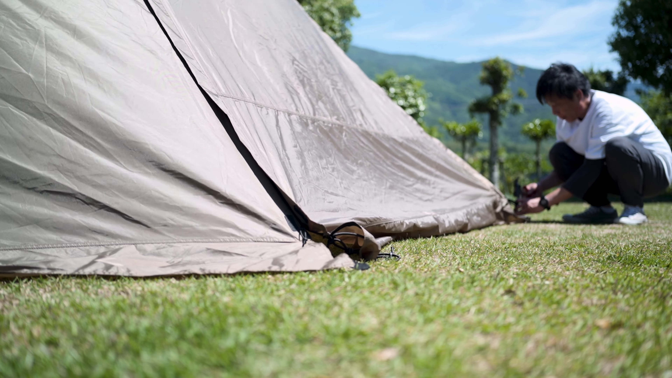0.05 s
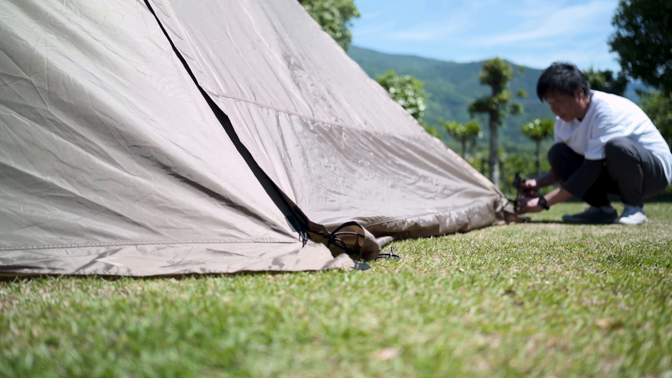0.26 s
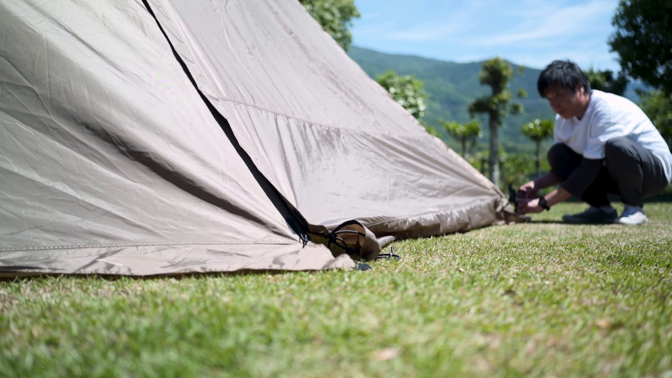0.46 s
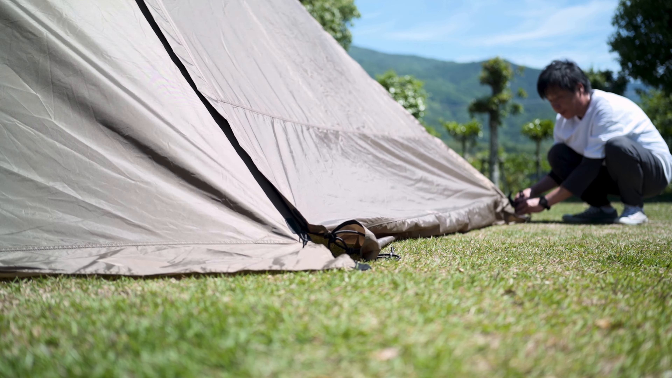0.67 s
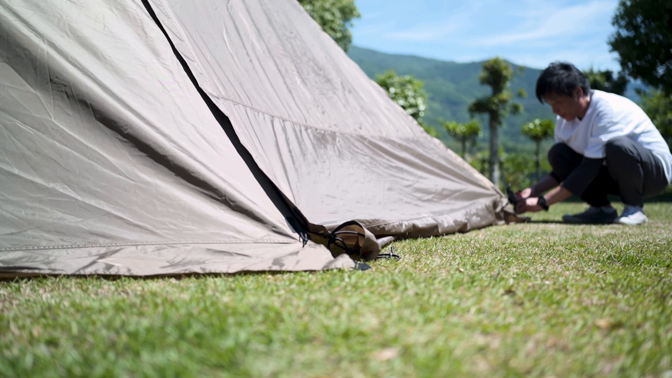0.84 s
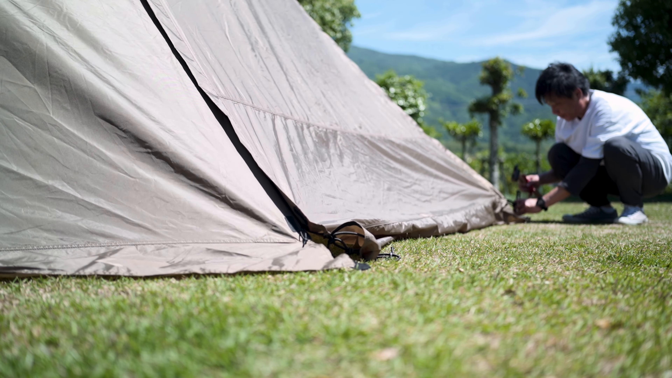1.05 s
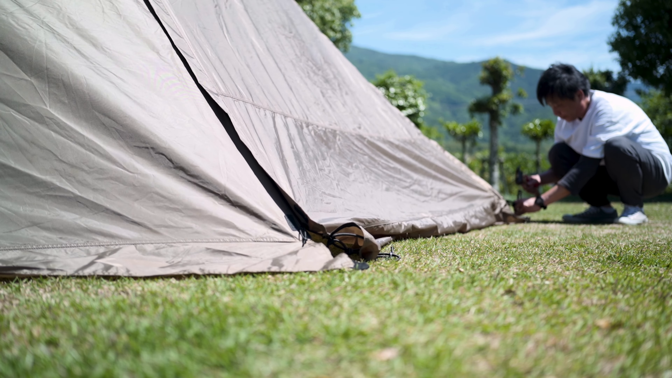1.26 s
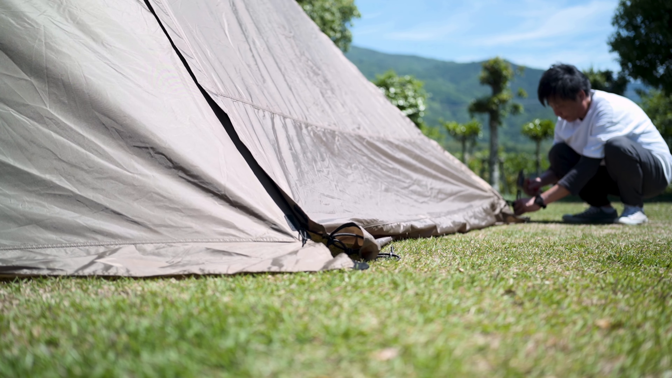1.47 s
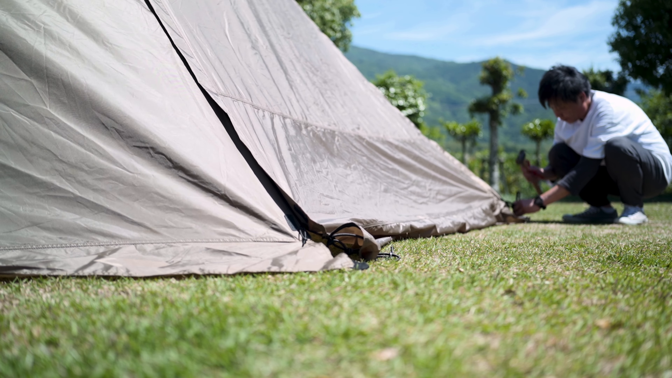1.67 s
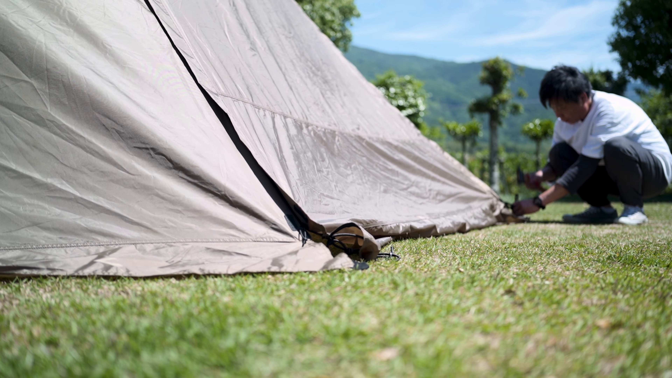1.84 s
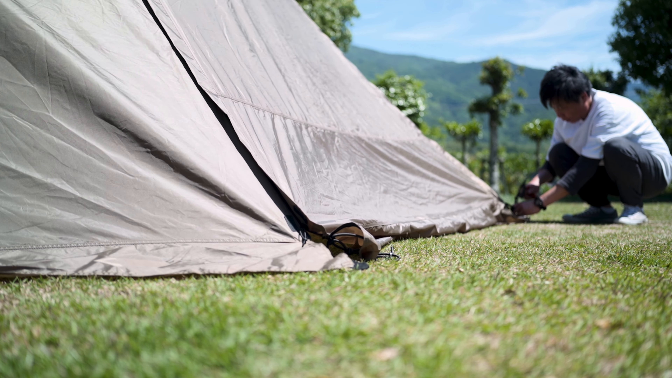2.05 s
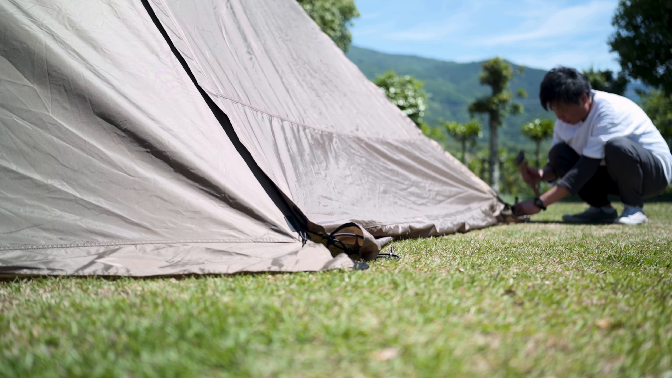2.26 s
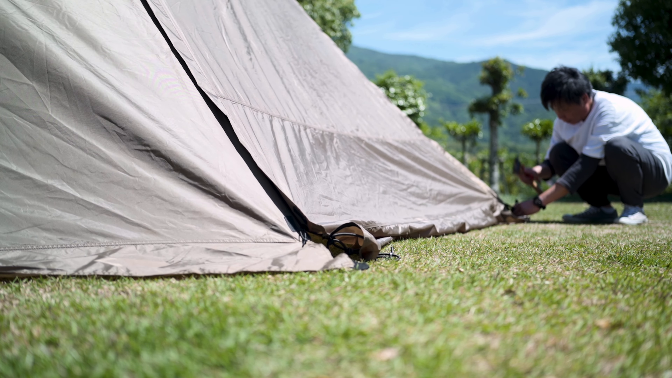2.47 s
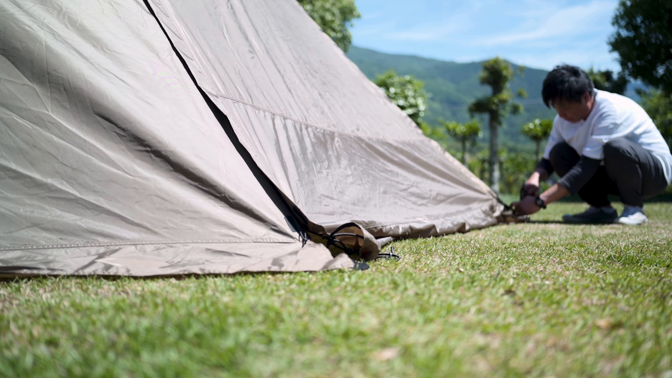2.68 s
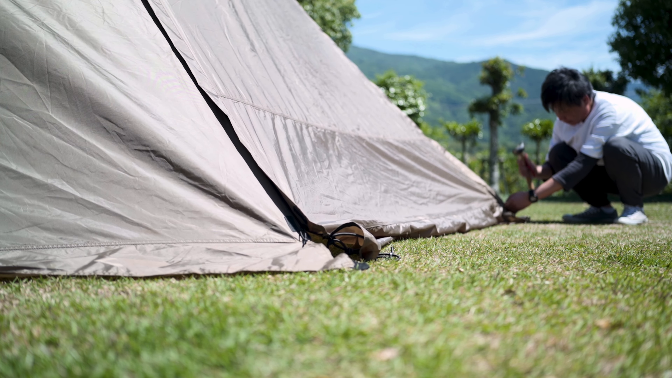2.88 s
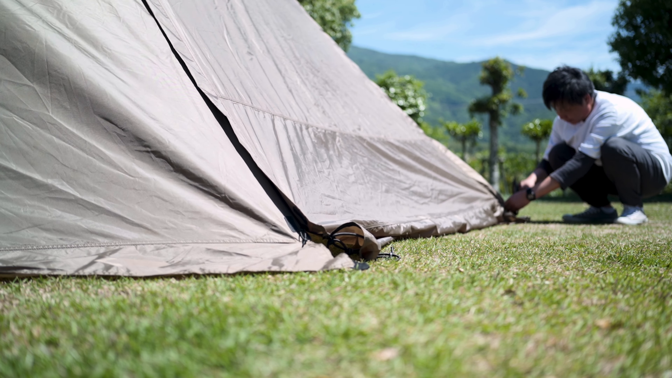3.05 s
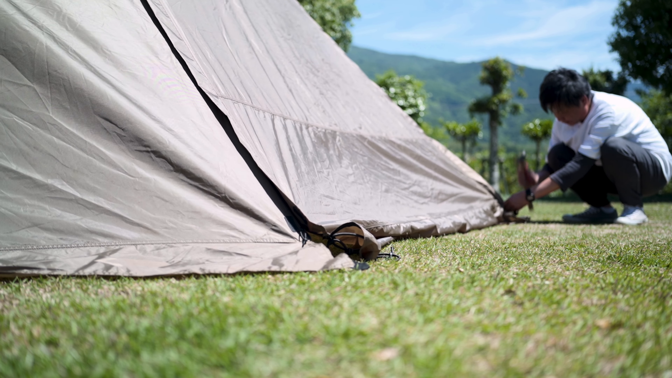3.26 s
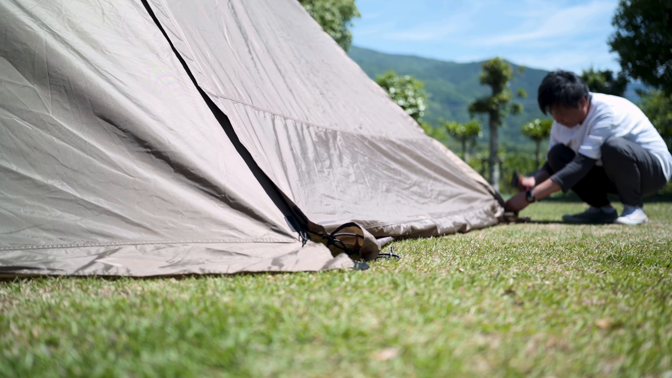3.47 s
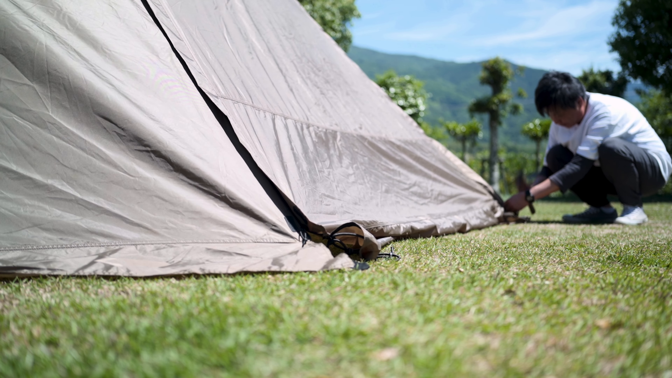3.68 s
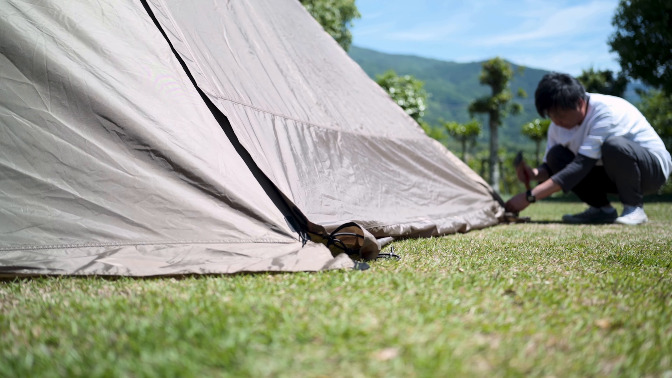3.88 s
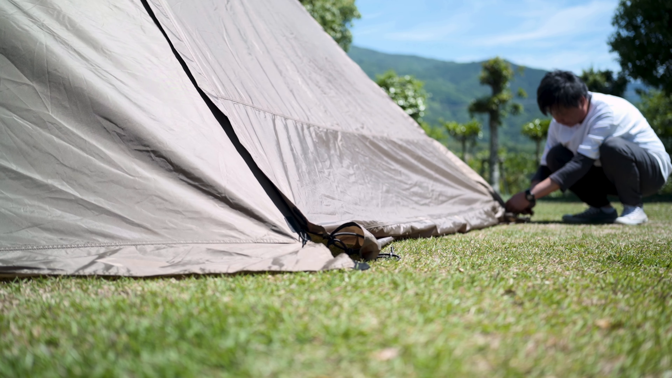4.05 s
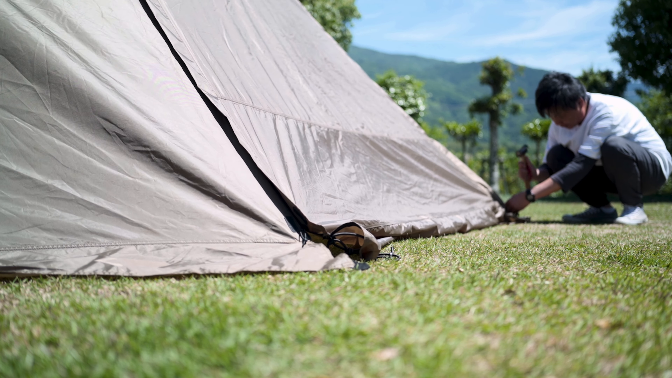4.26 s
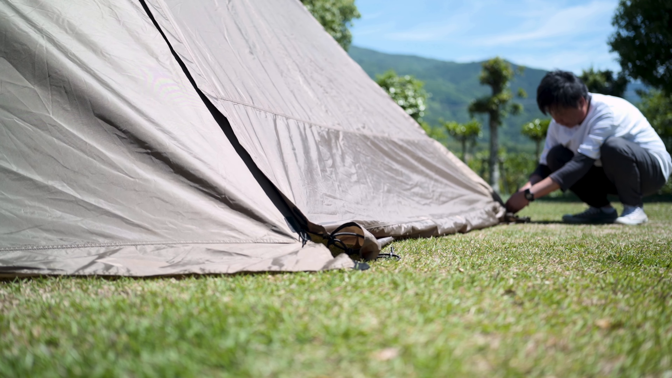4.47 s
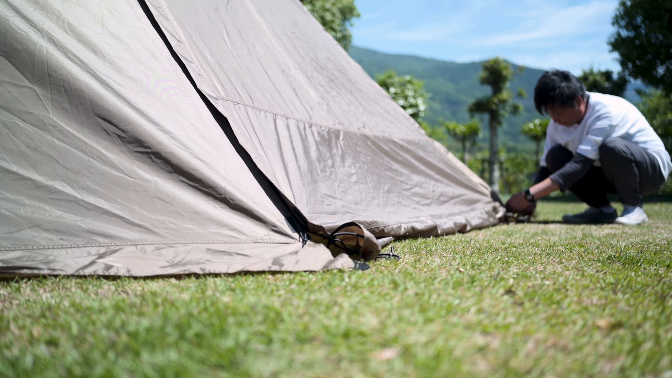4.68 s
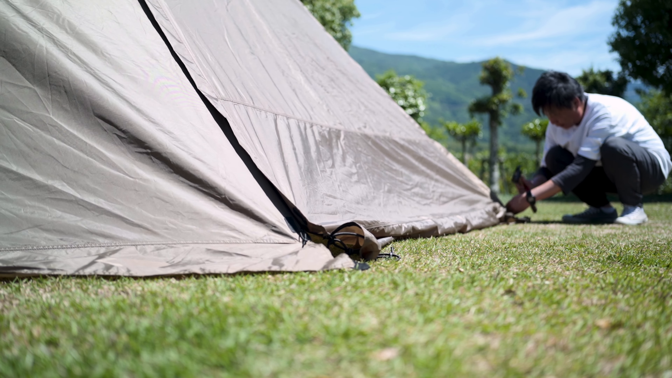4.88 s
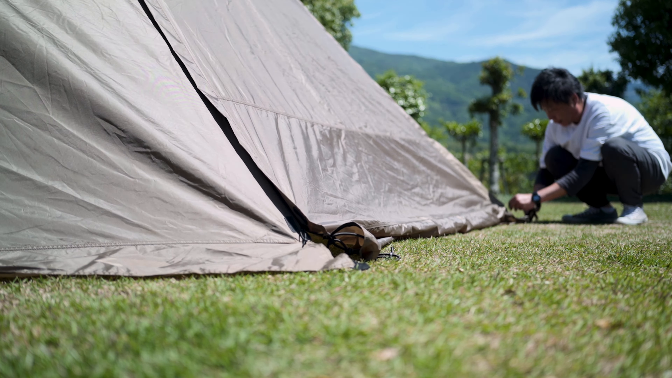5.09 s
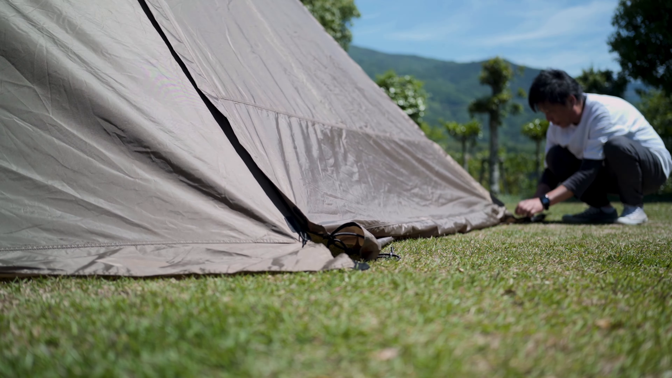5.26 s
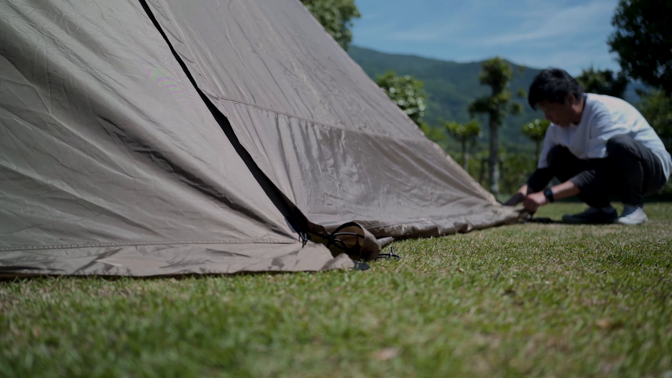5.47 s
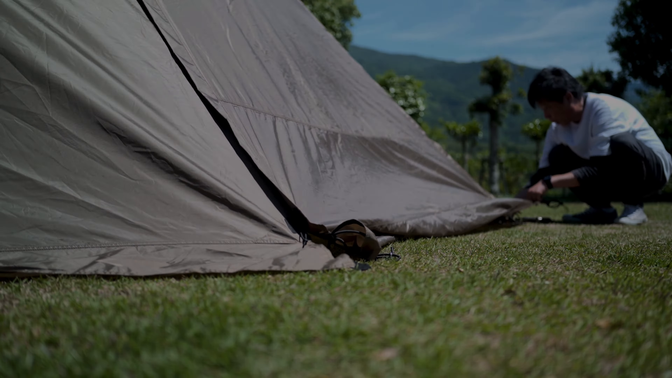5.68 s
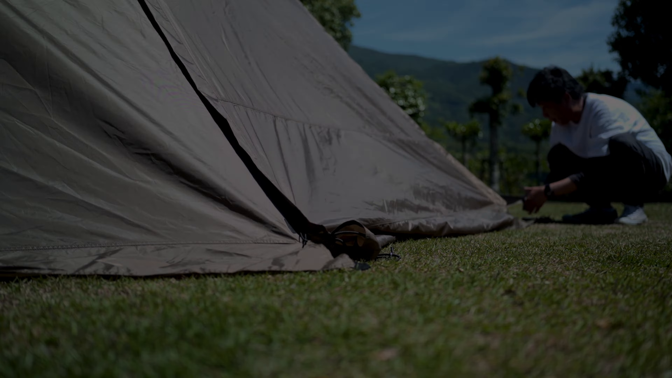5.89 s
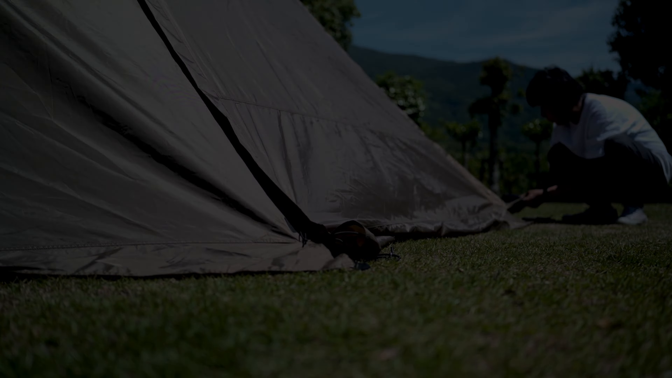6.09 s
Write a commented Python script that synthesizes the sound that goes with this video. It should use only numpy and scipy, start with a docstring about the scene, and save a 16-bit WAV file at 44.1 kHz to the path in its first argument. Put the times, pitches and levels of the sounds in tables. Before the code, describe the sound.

A soft outdoor wash with a faint low hum runs throughout. In the first 0.4 seconds a few tiny, thin bird chirps sound, and a crow caws hoarsely far away at about 0.2 and 1.1 seconds. At 1.6 seconds a hammer begins hitting a steel tent peg: twelve blows, roughly every 0.3 seconds, until 5.1. Each is a sharp, dry metallic crack with very high, brief ringing, loud enough to clip the microphone, followed by a quick scattered slap from ground and tent wall and a hissing return from trees. Pitch colour and ring length vary from blow to blow; from about 3 seconds the ground thud grows, and the last blow is the heaviest. Another distant caw falls at 2.0, faint chirps at 3.3 and 4.0. From 5.5 to 6.1 seconds tent cloth rustles crisply, with dull flaps and two tiny buckle ticks just before 6.

```python
"""An outdoor hush with a low hum runs throughout; small birds chirp and a crow caws far off, both
before and between the blows. From 1.57 s a hammer drives a steel tent peg into a lawn with twelve
blows that overload the microphone. Damped modes make the steel ring, a low push makes the ground
thud, and scattered reflections from ground, tent wall and then trees throw each blow back.
At the end filtered noise grains rustle as tent cloth, with dull flaps and two buckle ticks."""
import sys
import numpy as np
from scipy import signal
from scipy.fft import rfft, irfft
from scipy.io import wavfile
from scipy.ndimage import uniform_filter1d

SR = 44100
rng = np.random.default_rng(int(sys.argv[2]) if len(sys.argv) > 2 else 0)


def to_wav(sig):
    """Store sig (one row per channel, or 1-D mono) as 16-bit WAV at the path in sys.argv[1].

    Samples outside -1..1 are clipped; the rate is SR.
    """
    pcm = np.clip(np.atleast_2d(sig), -1, 1) * 32767
    pcm = np.round(pcm).astype(np.int16)
    wavfile.write(sys.argv[1], SR, pcm.T)  # frames by channels


N = 270377

# Levels in the tables are relative: each source adds its own gain. Spectra list [f/Hz, level/dB].
# Outdoor wash: spectrum [f/Hz, level/dB]
HUSH_SPECTRUM = [(25, -46.5), (45, -18), (70, -10), (100, -3), (240, -4.5), (500, -9), (800, -13.5),
                 (1300, -17), (2000, -23.5), (4500, -26.5), (7000, -30.5), (11000, -29), (15500, -35.5),
                 (16300, -56.5)]
HUSH_DB = -63
HUM_HZ, HUM_DB = 59.06, -64.5

# Bird whistles: [t/s, length/s, start f/Hz, end f/Hz, level/dB]
CHIRPS = [(0.127, 0.034, 3500, 3450, -73), (0.18, 0.061, 3600, 3600, -75), (0.384, .03, 3500, 3450, -76),
          (3.33, 0.038, 3110, 3000, -74.5), (4.016, 0.054, 5400, 5390, -57.5),
          (4.039, 0.077, 4520, 4030, -69.5)]

# Crow calls: [t/s, length/s, lower throat ring level/dB, upper ring level/dB]
CAWS = [(0.219, .5, -60.5, -57), (1.088, 0.43, -58, -58), (2.043, 0.47, -61.5, -59.5)]
# Course of every caw: [share of length, lower ring level/dB, upper ring level/dB,
# mouth opening as a factor on the f of the sinking strand]
CAW_SHAPE = [(0, -27, -29, .86), (.08, -4, -18, .9), (.2, 1, -11.5, 1), (.34, -8.5, 0.5, 1),
             (.55, -7, -6, 1), (.7, -17, -7, .94), (.88, -15, -10.5, 0.87), (1, -29, -15, 0.72)]

# Course of the cloth friction: [t/s, swish level/dB, hiss level over swish/dB]
RUSTLE = [(5.45, -76, -7), (5.54, -69.5, -11), (5.6, -53, -6), (5.67, -47.5, 2.5), (5.71, -54, 3),
          (5.75, -52, 0.5), (5.785, -61, -3), (5.83, -60.5, 3), (5.892, -72, -2), (5.901, -53, -18),
          (5.927, -56, 3), (5.95, -54.5, 1.26), (5.975, -64, -1.5), (5.995, -55.5, 0.3), (6.06, -79, -1),
          (6.09, -69, 13.5), (6.13, -75.5, 19.5)]
# Spectra of swish, hiss and flaps: [f/Hz, level/dB]
SWISH_SPECTRUM = [(2000, -44), (4000, 3), (6500, 7.5), (9000, 4), (12000, -40), (15800, -30), (16300, -60)]
HISS_SPECTRUM = [(6000, -15.5), (8500, -3), (12000, -2.5), (13000, -9.5), (15700, -10), (16200, -48)]
FLAP_SPECTRUM = [(120, -6), (280, 1), (800, -0.5), (2000, -9.5), (4000, -21), (9000, -48)]
# Dull cloth flaps: [t/s, hold/s, level/dB]
FLAPS = [(5.66, 0.026, -64), (5.787, 0.0075, -64), (5.901, 0.037, -48.5), (5.986, 0.0077, -83),
         (6.08, 0.034, -74)]
FLAP_RISE_DB_PER_S, FLAP_FALL_DB_PER_S, FLAP_REST_DB = 4000, 401, -69

# Buckle ticks: [t/s, click peak level/dB, thin ring level/dB]
TICKS = [(5.924, -30, -66), (5.9858, -26.5, -57)]

# Reflection spectra of ground, tent wall and trees: [f/Hz, level/dB]
GROUND_SPECTRUM = [(300, -7.5), (1500, -4.5), (4000, -9), (9000, -8), (12000, -8.5), (15700, -9.5),
                   (16200, -39)]
WALL_SPECTRUM = [(300, -7), (1000, -5), (2700, 2), (4500, -6.5), (6500, -9.5), (9500, -6), (12000, -16),
                 (15700, -19.5), (16200, -39)]
TREES_SPECTRUM = [(300, -30), (1500, -9), (3000, -5), (4500, -1), (7000, 0.5), (9500, 2.5), (12500, -6.5),
                  (15700, -16.5), (16200, -39.5)]
# Reverberation of the trees: [f/Hz, time to fall 60 dB/s]
TREES_T60 = [(1000, .5), (4000, 0.25), (9000, 0.26), (14000, 0.25)]
ECHO_TREBLE_DB = -3.5  # further echo level from 9 kHz up
THROWN_RING_DB, THROWN_RING_T60_S = 1.5, 0.02  # only the start of the short rings is thrown back

RUMBLE_DB, RUMBLE_FOLLOW = -31, 0.54  # the rumble follows the thud by this share of its dB

# Two long rings of the hammer head: [low f/Hz, high f/Hz]
HEAD_HZ = (5696, 7537)
# Low and high long ring of each blow, each: [top level/dB, rise time/s, time to fall 37.7 dB/s,
# bend of the fall, echo level/dB, time for the echo to fall 34 dB/s]
LONG_RINGS = [
    [(-33.0, 0.007, 0.107, 0.502, -49.8, 0.152), (-16.7, 0.0119, 0.0306, 2.5, -49.8, 0.109)],
    [(-19.7, 0.00471, 0.266, 0.729, -30.5, 0.167), (-22.0, 0.002, 0.0303, 2.12, -74.1, 0.231)],
    [(-25.6, 0.0047, 0.0673, 1.07, -44.5, 0.13), (-21.7, 0.00503, 0.0598, 1.25, -47.5, 0.0941)],
    [(-33.3, 0.004, 0.123, 0.501, -51.9, 0.149), (-33.1, 0.002, 0.05, 1.92, -53.0, 0.0939)],
    [(-35.6, 0.004, 0.139, 0.652, -52.5, 0.193), (-36.9, 0.00446, 0.0549, 1.73, -53.9, 0.0961)],
    [(-29.4, 0.002, 0.314, 1.52, -28.3, 0.177), (-27.8, 0.002, 0.0746, 1.56, -50.2, 0.107)],
    [(-26.0, 0.0186, 0.171, 0.5, -37.2, 0.239), (-28.1, 0.00582, 0.0744, 1.28, -52.2, 0.163)],
    [(-46.7, 0.002, 0.508, 1.19, -47.6, 0.229), (-19.1, 0.00575, 0.0837, 0.841, -38.7, 0.114)],
    [(-33.0, 0.00549, 0.149, 0.592, -53.0, 0.12), (-33.1, 0.002, 0.0972, 1.69, -49.3, 0.136)],
    [(-57.0, 0.002, 0.381, 1.07, -55.3, 0.186), (-8.9, 0.00824, 0.121, 0.546, -34.2, 0.0858)],
    [(-40.1, 0.007, 0.119, 1.49, -54.9, 0.177), (-23.6, 0.0043, 0.0424, 1.51, -48.6, 0.0769)],
    [(-12.3, 0.0182, 0.119, 0.5, -38.6, 0.0689), (-10.4, 0.00498, 0.0395, 1.23, -59.7, 0.139)],
]
RING_ECHO_S, RING_ECHO_RISE_S, RING_ECHO_BEND = .085, .008, 2.2
RING_ECHO_CANCEL = .85  # the echo returns out of step and cancels the ring where the two are alike

# Damped modes of the steel in four groups, each mode: [f/Hz, level/dB, time to fall 60 dB/s]
STEEL_MODES = [
    [(9330, -2, .014), (9520, 0, .018)],
    [(12090, 0, .014), (11500, -16, .02)],
    [(12610, 0, .028), (12810, -14, .05)],
    [(13960, 0, .016), (15650, -10, .016)],
]
# Spectra of the bright grit and the dull crack: [f/Hz, level/dB]
BRIGHT_SPECTRUM = [(4000, -23), (6500, -4.5), (8500, 0.5), (11000, -3), (13000, 2), (15500, -3.5),
                   (17000, -18)]
DULL_SPECTRUM = [(700, -29), (1300, -8.5), (2100, -1), (3000, -1.5), (4700, 3.5), (6000, 3), (8000, -26)]
GRIT_DB = -14
# Hammer blows: [t/s, dull crack level/dB, level/dB of the four mode groups, factor on mode times,
# low and high knock level/dB, thud level/dB, thud f/Hz, echo level/dB]
BLOWS = [(1.5708, -27.5, -21.5, -18.5, -16.5, -18, 2.3, -55.5, -44.5, -74, 183, -16.5),
         (1.8411, -20.5, -17, -6.5, -8.5, -17.5, 0.93, -36.5, -38, -56, 156.6, -19),
         (2.1237, -26.5, -25, -9, -11, -12, 0.53, -36, -43, -70, 176, -17.5),
         (2.411, -25.5, -21.5, -13.5, -11, -14.5, 0.98, -32.5, -46, -51, 177.6, -16.5),
         (2.7088, -28.5, -16, -8.5, -13.5, -10, 0.61, -42.5, -35.5, -56.5, 132.7, -19),
         (3.0564, -19.5, -23, -13, -17, -11, 1.4, -32.5, -26, -39.5, 121, -16.5),
         (3.4028, -22.5, -15, -16, -12, -9, 0.94, -25, -28, -42, 133.5, -16),
         (3.7946, -24, -27.5, -19.5, -9, -13, 1.14, -44.5, -28, -50, 108.6, -15.5),
         (4.124, -20, -32.5, -7, -10, -27, 1.27, -38, -31.5, -55, 122, -17),
         (4.452, -15.5, -34.5, -14, -13, -20.5, 1.33, -31.5, -27, -37, 118.7, -17.5),
         (4.7685, -23.5, -31.5, -15.5, -14.5, -6.5, 0.75, -34, -30.5, -38, 112.5, -16),
         (5.0687, -17.5, -39, -19.5, -19, -16.5, 1.8, -18, -20, -26, 129.5, -21.5)]
FORE_TICK_S, FORE_TICK_DB, FORE_TICK_LENGTH_S = 0.0017, -22.5, 0.00048  # tick ahead of each blow
EDGE_HZ = 16500


def gain_of(db):
    """Level law: 20 dB make a factor of ten in amplitude."""
    return 10 ** (np.asarray(db) / 20)


def evened(x):
    """Normalisation to unit effective value (RMS)."""
    return x / np.sqrt(np.mean(x ** 2) + 1e-20)


def read(points, hz):
    """Linear interpolation over logarithmic frequency."""
    f, value = np.transpose(points)[:2]
    return np.interp(np.log(hz + 1), np.log(f + 1), value)


def add(mix, s, sound):
    """Superposition: a sound starting at s seconds adds to the mix."""
    part = mix[round(s * SR):][:len(sound)]
    part += sound[:len(part)]


def coloured(x, spectrum):
    """Linear filtering: each frequency of x is weighted by a spectrum in dB."""
    hz = np.fft.rfftfreq(len(x), 1 / SR)
    return irfft(rfft(x) * gain_of(read(spectrum, hz)), len(x))


def resonate(x, hz, width):
    """Resonance by heterodyning: shift the curve hz to zero, smooth, shift back; peak gain 1."""
    turn = np.exp(2j * np.pi * np.cumsum(hz * np.ones(len(x))) / SR)
    r = np.exp(-np.pi * width / SR)
    smooth = signal.lfilter([1 - r], [1, -r], x / turn + 1e-18)
    return 2 * (turn * smooth).real


def hush():
    """Broadband noise with a slowly varying spectrum: a distant wash in patches, and a wavering hum."""
    frames, hz = N // 256 + 5, np.fft.rfftfreq(1024, 1 / SR)
    a, b, patches = rng.standard_normal((frames, 513, 3)).T
    patches = uniform_filter1d(uniform_filter1d(patches, 14, 0), 16, 1)
    patches = 1.3 * evened(patches)  # dB
    z = (a + 1j * b) * gain_of(read(HUSH_SPECTRUM, hz)[:, None] + patches)
    wash = evened(signal.istft(z, nperseg=1024, noverlap=768)[1][:N])
    hum = resonate(resonate(rng.standard_normal(N), HUM_HZ, 15), HUM_HZ, 25)
    return gain_of(HUSH_DB) * wash + gain_of(HUM_DB) * evened(hum)


def chirp(s, length, start_hz, end_hz, db):
    """Narrow-band resonance of noise: a far, slightly fuzzy whistle, level or falling in pitch."""
    n = round(length * SR)
    whistle = resonate(rng.standard_normal(n), np.linspace(start_hz, end_hz, n), 60)
    return s, gain_of(db) * evened(whistle) * np.hanning(n)


def caw(start, length, low_top_db, high_top_db):
    """Source and filter: uneven throat pulses ring resonances; one strand sinks as the mouth closes."""
    share, *shape = np.transpose(CAW_SHAPE)
    t = np.arange(0, length, 1 / SR)
    low_db, high_db, mouth = (np.interp(t / length, share, c) for c in shape)
    jitter, grit = rng.standard_normal((2, len(t)))
    pulse_hz = 64 * (1 + 0.089 * evened(uniform_filter1d(jitter, 600)))
    turns = np.cumsum(pulse_hz) / SR
    pulses = np.exp(-(turns % 1) / 0.39) * (0.91 + grit) + 0.75 * grit

    def ring(hz, width):
        """Two cascaded resonances shape the pulses."""
        return evened(resonate(resonate(pulses, hz, width), hz, 2 * width))

    closing = np.clip((1 - mouth) / .2, 0, 1)
    steady = (1 - 0.22 * closing) * ring(1704, 110)
    sinking = (0.42 + .5 * closing) * ring(1570 * mouth, 170)
    top = (.12 + .45 * closing) * ring(2360, 110)
    voice = gain_of(low_top_db + low_db) * ring(1080, 94)
    voice += gain_of(high_top_db + high_db) * (steady + sinking + top)
    return start, voice * signal.windows.tukey(len(t), .1)


def rustle():
    """Friction noise: cloth drags over cloth in fine grains, a few larger snaps and dull flaps."""
    s, swish_db, hiss_db = np.transpose(RUSTLE)
    t = np.arange(s[0], N / SR, 1 / SR)
    grit = rng.standard_normal((3, len(t)))
    grit *= gain_of(3.4 * np.minimum(rng.exponential(1, len(t)), 6))  # the larger snaps
    flaps = gain_of(FLAP_REST_DB)
    for at, hold, db in FLAPS:
        rise_db = FLAP_RISE_DB_PER_S * np.maximum(at - t, 0)
        fall_db = FLAP_FALL_DB_PER_S * np.maximum(t - at - hold, 0)
        flaps = flaps + gain_of(db - rise_db - fall_db)
    swish = gain_of(np.interp(t, s, swish_db))
    hiss = gain_of(np.interp(t, s, swish_db + hiss_db))
    layers = zip(grit, (SWISH_SPECTRUM, HISS_SPECTRUM, FLAP_SPECTRUM), (swish, hiss, flaps))
    return s[0], sum(level * evened(coloured(g, spectrum)) for g, spectrum, level in layers)


def tick(s, db, ring_db):
    """Impulse excitation: a buckle gives a bright click and a thin, high damped ring."""
    t = np.arange(round(.05 * SR)) / SR
    burst = rng.standard_normal(len(t)) * gain_of(-60 * np.abs(t - .002) / 0.0035)
    click = coloured(burst, [(3000, -44), (4200, -4), (12000, -11), (13000, -26)])
    ring = gain_of(ring_db - 60 * t / 0.069) * np.sin(2 * np.pi * 14900 * t)
    return s - .002, gain_of(db) * click / np.abs(click).max() + ring * (t > .002)


def surroundings():
    """Scattered reflection, drawn anew for each blow: ground and tent wall, then a swell from the trees."""
    taps = rng.standard_normal((3, SR // 2)) * gain_of(1.7 * rng.exponential(1, (3, SR // 2)))
    hz, t, z = signal.stft(taps, SR, nperseg=128, noverlap=96)
    ground_db = read(GROUND_SPECTRUM, hz)[:, None] - 60 * t / 0.45
    ground = gain_of(ground_db) / (1 + np.exp((t - .047) / .003))
    wall = gain_of(read(WALL_SPECTRUM, hz)[:, None] - 0.5) * np.exp(-((t - .035) / 0.006) ** 2)
    # the trees answer faintly at once, then in two steps
    arrive = .08 + 0.13 / (1 + np.exp(-(t - .06) / 0.0027)) + 0.26 / (1 + np.exp(-(t - .082) / 0.0061))
    fade_db = 60 * np.maximum(t - .095, 0) / read(TREES_T60, hz)[:, None]
    trees = arrive * gain_of(read(TREES_SPECTRUM, hz)[:, None] - fade_db)
    taps = signal.istft(z[0] * ground + z[1] * wall + z[2] * trees, SR, nperseg=128, noverlap=96)[1]
    return taps / np.linalg.norm(taps)  # unit energy


def thud(db, hz, rumble_db):
    """Momentum transfer: the lawn gives a short low push; a rough rumble follows as the soil settles."""
    t = np.arange(round(.25 * SR)) / SR
    push = np.exp(-((t - .012) / .009) ** 2) * np.sin(2 * np.pi * hz * t)
    rumble = evened(resonate(resonate(rng.standard_normal(len(t)), 110, 70), 120, 120))
    settle = np.maximum(t - .028, 0) / 0.024
    return gain_of(db + 6.5) * push + gain_of(rumble_db) * rumble * settle * np.exp(1 - settle)


def head(hz, top_db, top_s, fall_s, bend, echo_db, echo_s):
    """Interference: a long ring dies, swells as the trees throw it back, and wavers more when scattered."""
    t = np.arange(round(.4 * SR)) / SR
    fall_db = 37.7 * (np.maximum(t - top_s, 0) / fall_s) ** bend
    direct = np.minimum(t / top_s, 1) * gain_of(top_db - fall_db)
    late = t - RING_ECHO_S
    echo_fall_db = 34 * (np.maximum(late, 0) / echo_s) ** RING_ECHO_BEND
    echo = gain_of(echo_db - echo_fall_db) / (1 + np.exp(-late / RING_ECHO_RISE_S))
    level = np.sqrt(direct ** 2 + echo ** 2 - 2 * RING_ECHO_CANCEL * direct * echo)
    # faint stretches are mostly scattered sound
    scattered = np.clip((-29.5 - 20 * np.log10(level + 1e-9)) / 24, .05, .97)
    fuzzy = evened(resonate(resonate(rng.standard_normal(len(t)), hz, 50), hz, 80))
    pure = np.sqrt(2 * (1 - scattered ** 2)) * np.sin(2 * np.pi * hz * t)
    return level * (pure + scattered * fuzzy)


def steel(dull_db, rings_db, free, low_db, high_db):
    """Impact and modal decay: a noisy crack with a rebound of the head, a dull knock and short rings."""
    t = np.arange(round(.12 * SR)) / SR
    grit = rng.standard_normal((4, len(t)))
    turn = rng.random((5, 2, 2))
    rebound = np.maximum(t - .002 - 0.0039 * turn[-1, 0, 0], 0)
    contact = gain_of(-60 * t / 0.031) + 0.79 * (rebound > 0) * gain_of(-60 * rebound / 0.014)
    crack = gain_of(GRIT_DB) * evened(coloured(grit[0], BRIGHT_SPECTRUM)) * contact
    crack += gain_of(dull_db + 3.5) * evened(coloured(grit[1], DULL_SPECTRUM)) * contact
    knock = gain_of(low_db) * evened(resonate(resonate(grit[2], 580, 400), 390, 770))
    knock += gain_of(high_db) * evened(resonate(resonate(grit[3], 1080, 320), 1300, 740))
    crack += gain_of(0.5) * knock * (1 - np.exp(-t / 0.00083)) * gain_of(-60 * t / 0.048)
    rings = np.zeros(len(t))
    for group, ring_db, chance in zip(STEEL_MODES, rings_db, turn):
        for (hz, db, t60), (phase, grip) in zip(group, chance):
            hz = hz * (1 + 0.00094 * (grip - .5))  # the grip of the soil shifts each mode a little
            decay = gain_of(ring_db + db + 8 - 60 * t / (free * t60))
            rings += decay * np.sin(2 * np.pi * (hz * t + phase))
    return np.array([crack, rings]) * np.minimum(t / 0.00031, 1)


def blow(mix, row, long_rings):
    """Superposition of one blow: fore tick, steel, its reflections, the thud and the long rings."""
    s, dull_db, *rings_db, free, low_db, high_db, thud_db, thud_hz, echo_db = row
    crack, rings = steel(dull_db, rings_db, free, low_db, high_db)
    t = np.arange(len(rings)) / SR
    spread = crack + rings * gain_of(THROWN_RING_DB - 60 * t / THROWN_RING_T60_S)
    echo_spectrum = [(5000, echo_db), (9000, echo_db + ECHO_TREBLE_DB)]
    thrown = coloured(np.pad(spread, (0, 500)), echo_spectrum)
    fore = round(FORE_TICK_LENGTH_S * SR)
    fore_tick = (crack + rings)[:fore] * np.hanning(fore)
    add(mix, s - FORE_TICK_S, gain_of(FORE_TICK_DB) * fore_tick)
    add(mix, s, crack + rings)
    add(mix, s, signal.fftconvolve(thrown, surroundings()))
    add(mix, s + 0.0034, thud(thud_db, thud_hz, RUMBLE_DB + RUMBLE_FOLLOW * thud_db))
    add(mix, s, sum(head(hz, *ring) for hz, ring in zip(HEAD_HZ, long_rings)))


def scene():
    """Superposition of all sources upon the hush."""
    mix = hush()
    for row, long_rings in zip(BLOWS, LONG_RINGS):
        blow(mix, row, long_rings)
    for source, table in ((caw, CAWS), (chirp, CHIRPS), (tick, TICKS)):
        for row in table:
            add(mix, *source(*row))
    add(mix, *rustle())
    return mix[None]


def record(dry):
    """Saturation and band limiting: the loudest peaks clip, then a low-pass filter cuts the top."""
    clipped = np.clip(dry, -.93, .93)
    low_pass = signal.firwin(255, EDGE_HZ, window=("kaiser", 9), fs=SR)
    return signal.oaconvolve(clipped, low_pass[None], "same")


dry = scene()
out = record(dry)
to_wav(out)
```